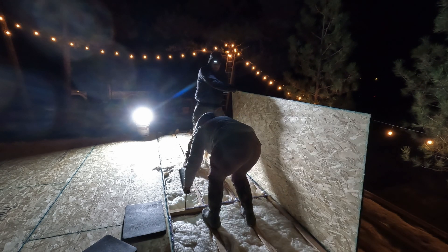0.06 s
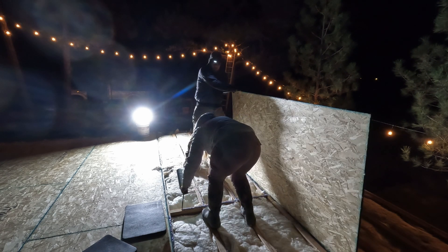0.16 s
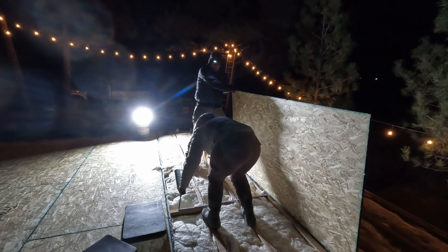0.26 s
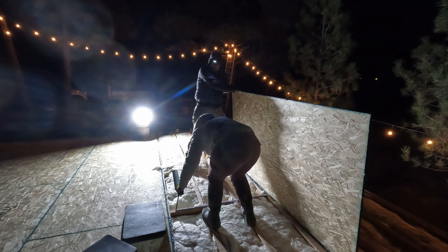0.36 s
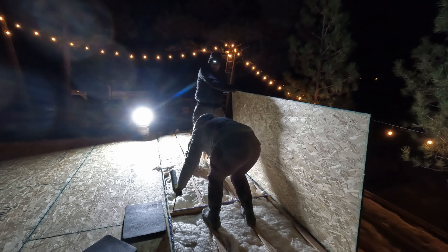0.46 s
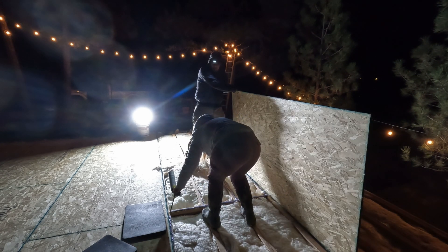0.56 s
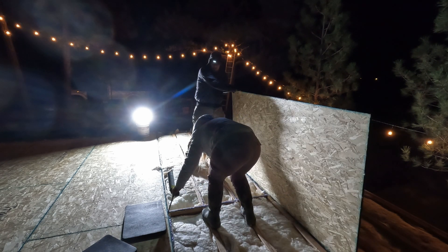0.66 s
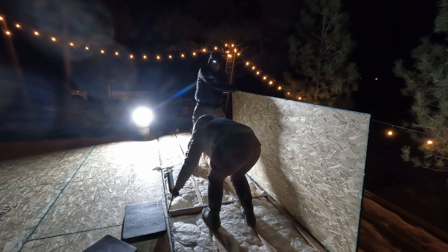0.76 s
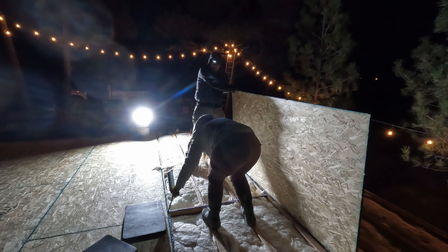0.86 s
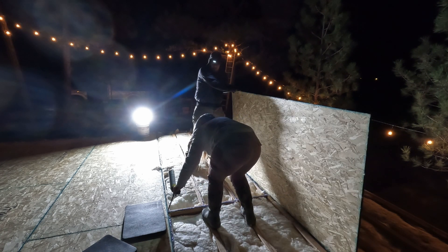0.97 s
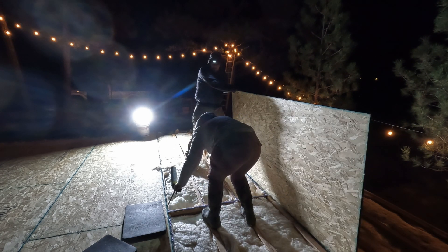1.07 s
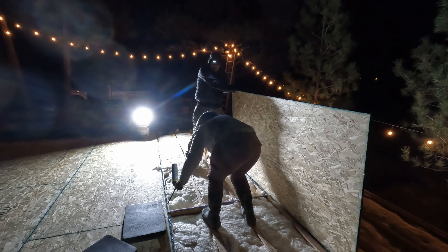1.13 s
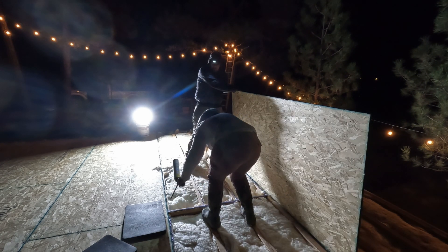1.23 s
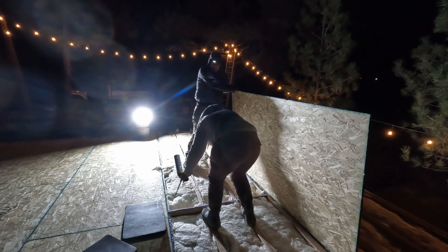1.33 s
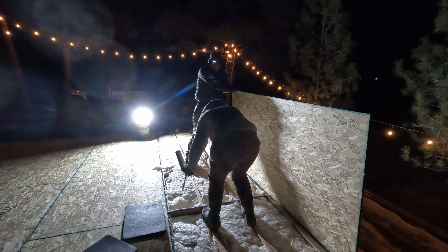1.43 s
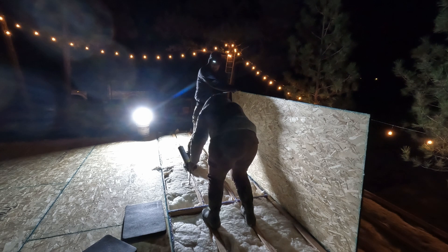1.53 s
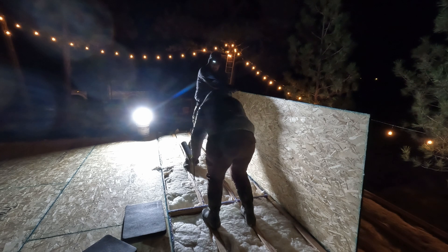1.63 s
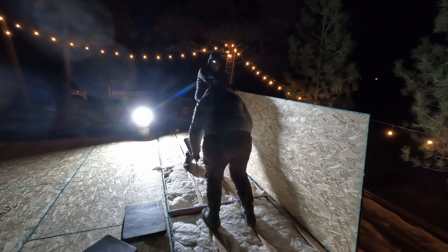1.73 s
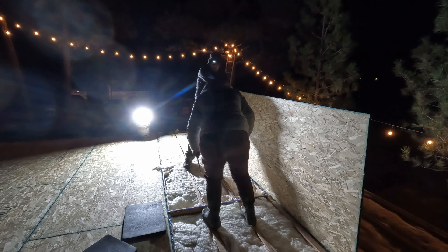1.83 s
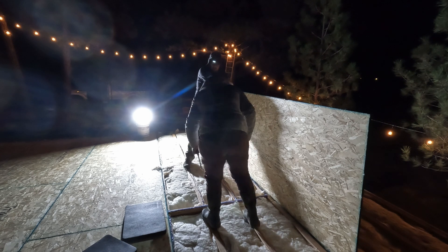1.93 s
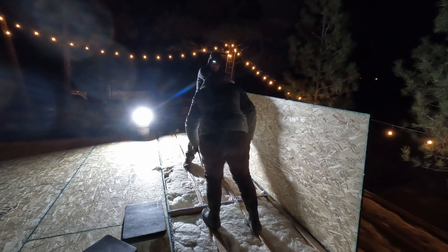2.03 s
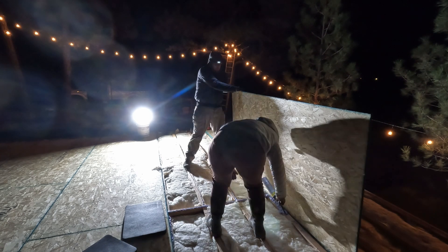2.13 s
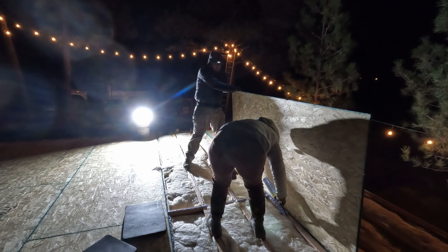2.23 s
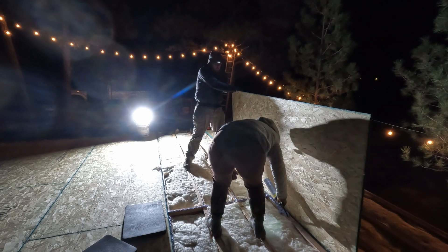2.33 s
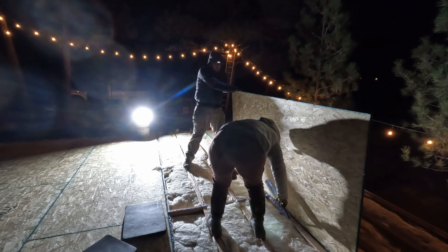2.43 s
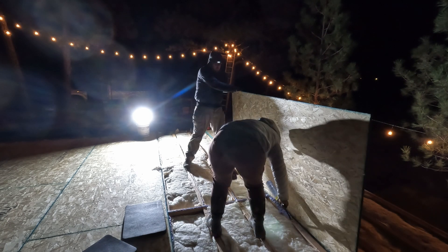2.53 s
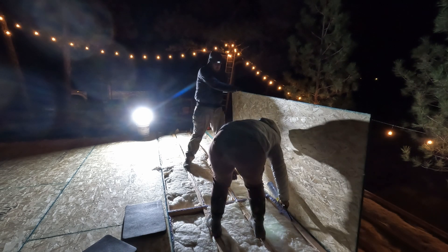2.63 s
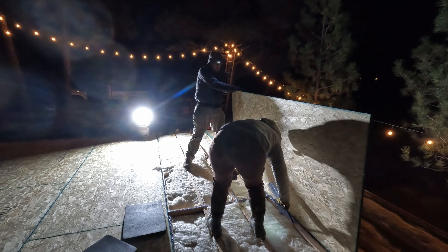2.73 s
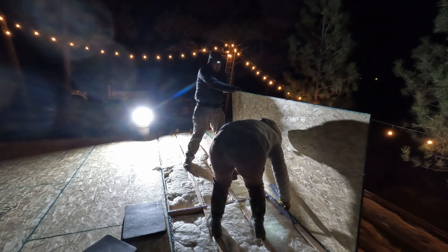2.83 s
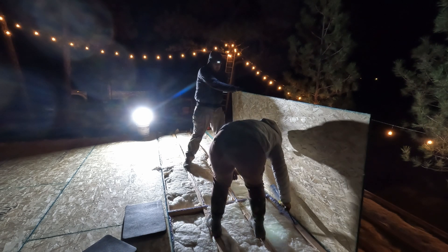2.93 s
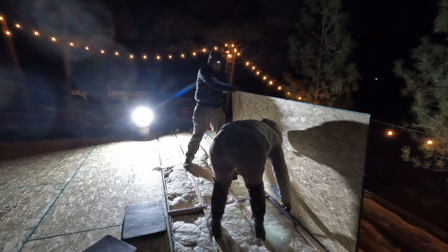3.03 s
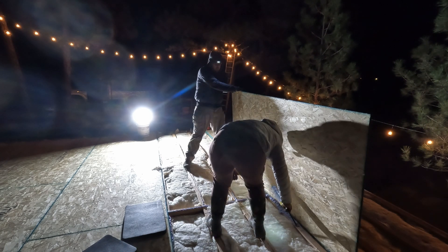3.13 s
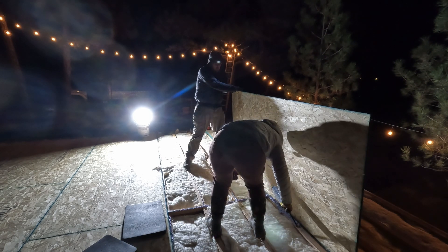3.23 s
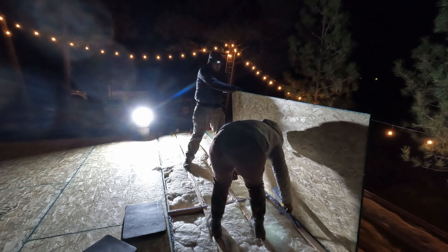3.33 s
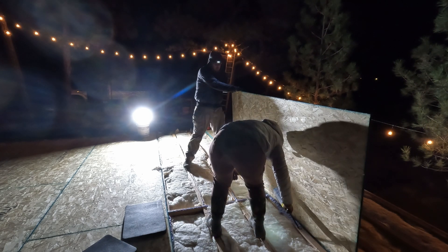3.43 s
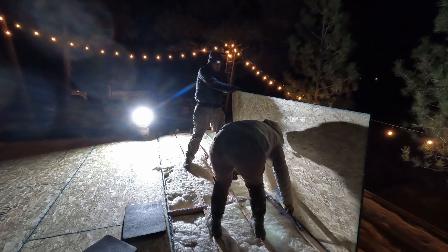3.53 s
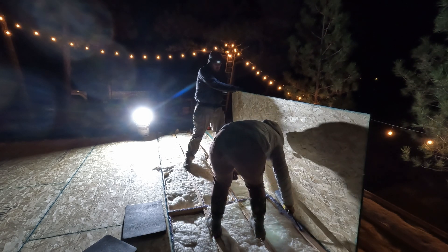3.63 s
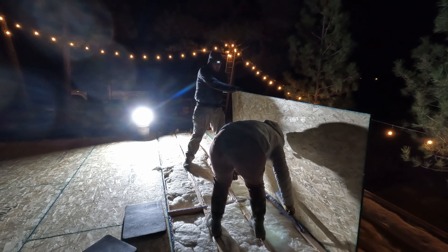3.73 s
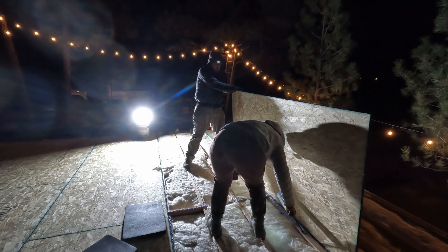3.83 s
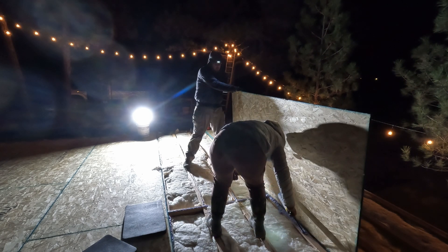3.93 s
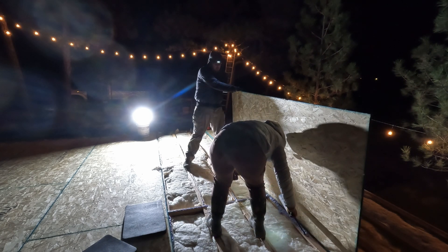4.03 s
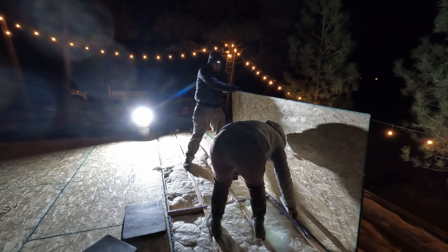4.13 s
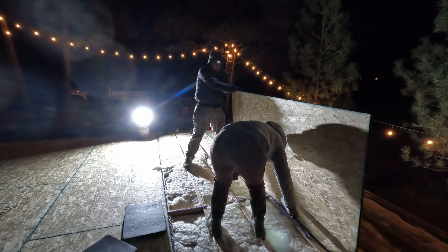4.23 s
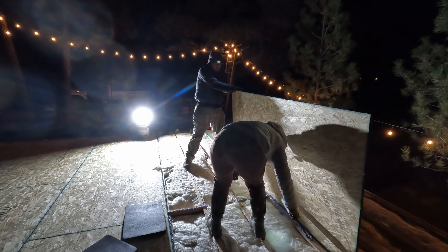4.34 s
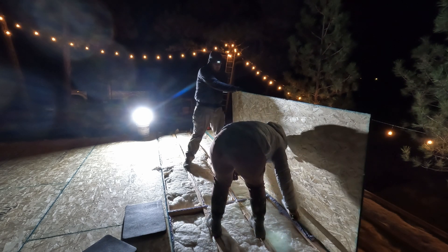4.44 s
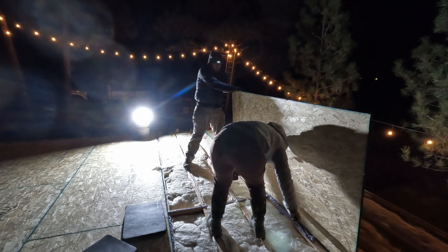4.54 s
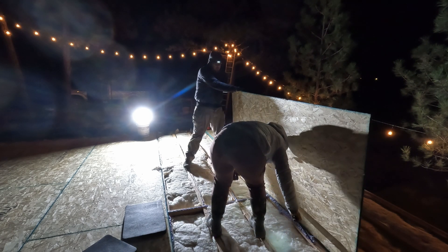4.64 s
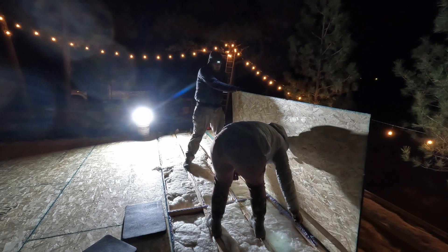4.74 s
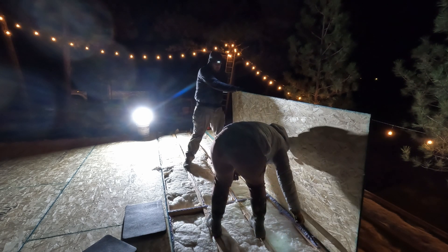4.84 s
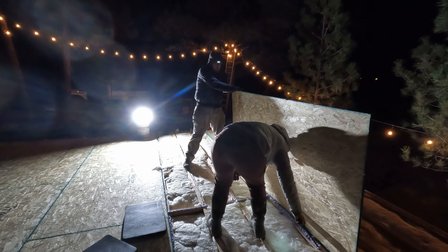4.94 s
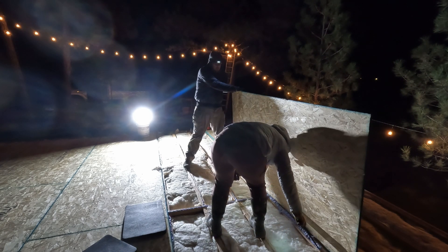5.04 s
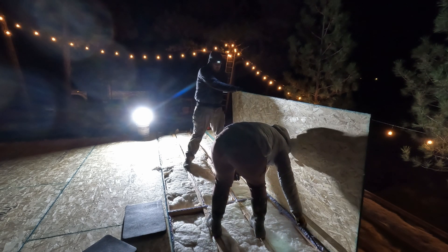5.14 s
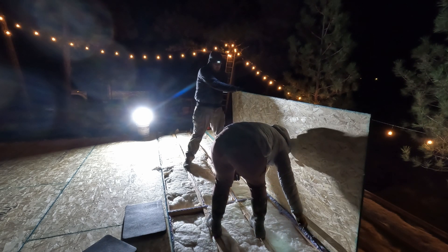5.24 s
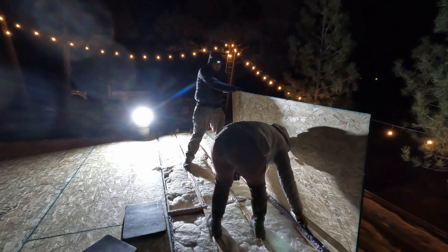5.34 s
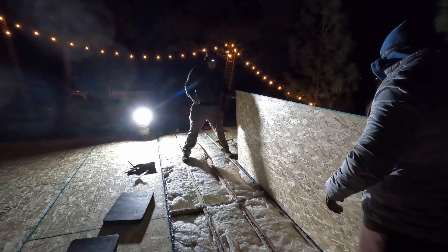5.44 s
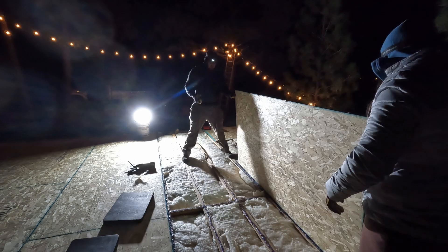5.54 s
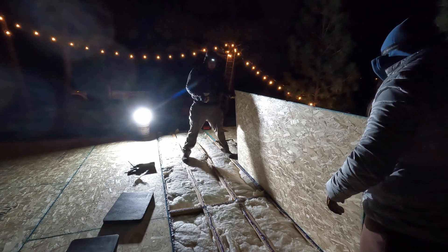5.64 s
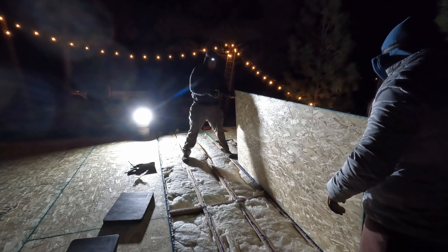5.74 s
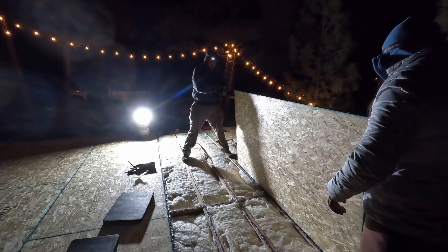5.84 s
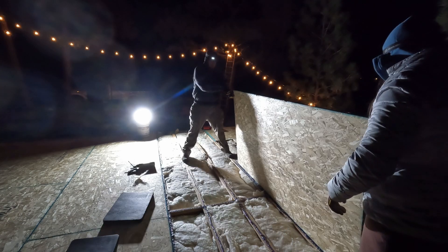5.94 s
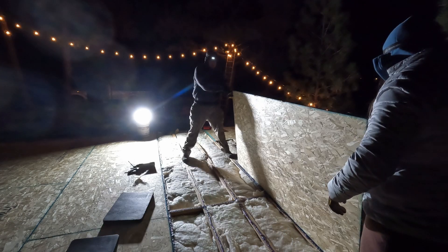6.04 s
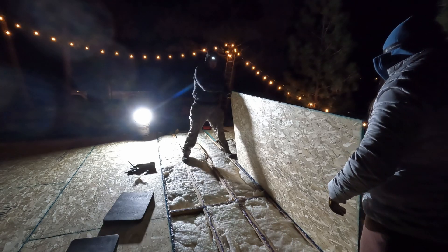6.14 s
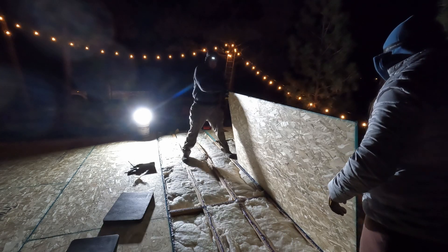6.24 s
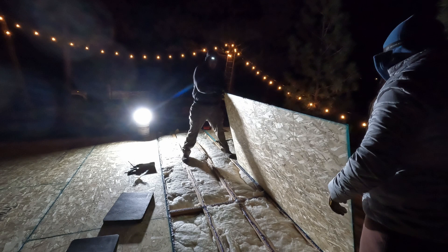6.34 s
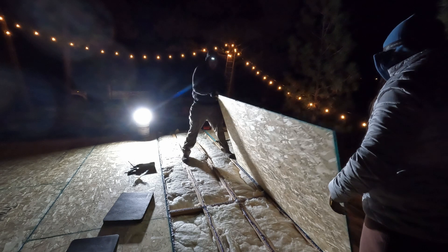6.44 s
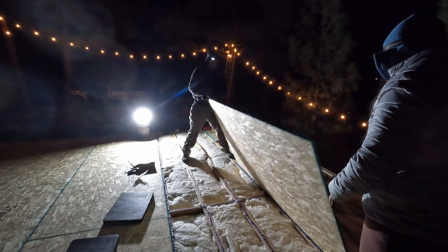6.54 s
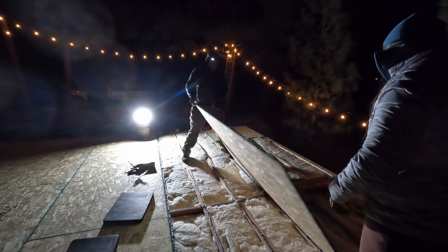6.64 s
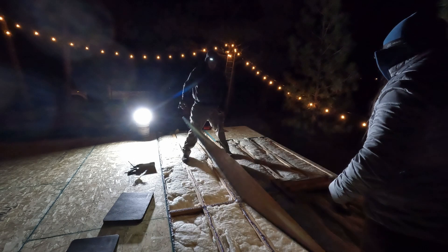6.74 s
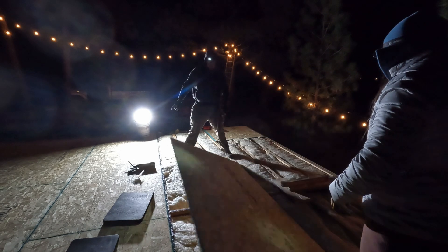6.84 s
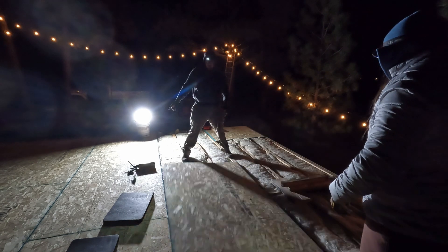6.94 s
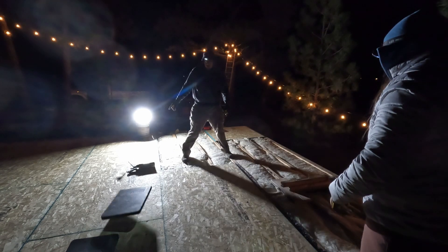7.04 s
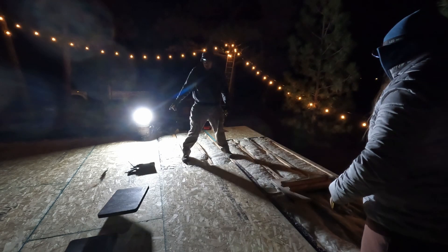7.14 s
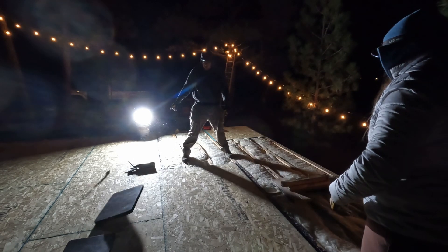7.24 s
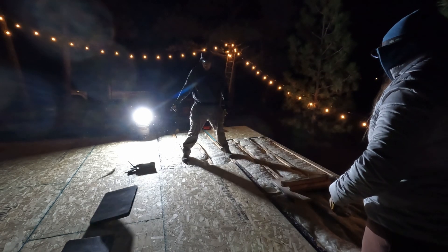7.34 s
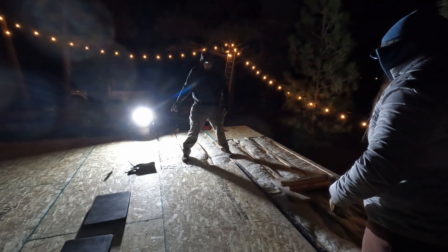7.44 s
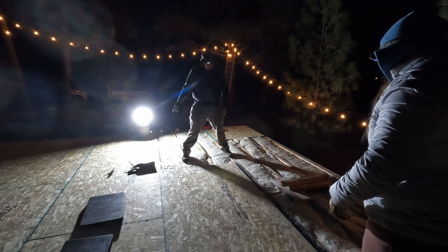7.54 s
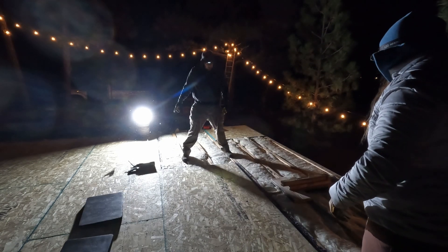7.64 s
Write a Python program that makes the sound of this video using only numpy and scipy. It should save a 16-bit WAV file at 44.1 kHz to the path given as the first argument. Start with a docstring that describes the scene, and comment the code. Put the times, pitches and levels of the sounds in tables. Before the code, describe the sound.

Close foam glue gun sputters two crackling, spitting beads on a quiet night deck, then a large wooden sheet slams flat with a booming thud.

```python
"""Foam gun and slamming sheet on a night deck

On a timber deck at night, close to the microphone, a foam glue gun sputters two beads along the joists:
filtered noise clicks spit as gas pockets over a crackle of many short ringing bubble bursts.
Boots shift and scuff as sliding grit; a smooth hiss swells between the beads. Then a big wooden sheet is
tipped over, pushes the air out from under it and slams flat: blows ring the deck's modes, slow swings
shake the deck the microphone stands on, and short echoes answer over the quiet noise of the night."""
import sys
import numpy as np
from scipy import signal
from scipy.fft import rfft, irfft
from scipy.io import wavfile
from scipy.ndimage import uniform_filter1d

SR = 44100
rng = np.random.default_rng(int(sys.argv[2]) if len(sys.argv) > 2 else 0)


def natural_amplitude(level_db):
    """Convert a level in decibels to a linear amplitude factor, elementwise."""
    exponent = np.asarray(level_db, float) / 20
    return 10 ** exponent


def pcm_store(signal):
    """Save signal as 16-bit PCM."""
    levels = np.round(np.clip(np.atleast_2d(signal), -1, 1) * 32767)
    wavfile.write(sys.argv[1], SR, levels.astype(np.int16).T)


N = 339129  # samples

# Levels of the gun's sounds are those inside the nozzle; spectra set shape only, not loudness.
# gas pockets blowing through the nozzle:
# (time [s], length [ms], hiss level [dB], gurgle level [dB], hiss centre [Hz])
SPITS = [(0.0388, 8.9, -62, -42.5, 4250.0), (0.054, 10.7, -47, -41.0, 4820.0),
         (0.133, 11.2, -47.0, -40, 4700), (0.1626, 8.2, -48, -42.0, 5150),
         (0.239, 11.4, -43.5, -38.5, 4170.0), (0.2971, 6.8, -43, -39.5, 5050),
         (0.3362, 11, -42.0, -41.0, 5300), (0.3559, 11.6, -44.5, -39, 4660.0),
         (0.4347, 12.3, -44.5, -37.5, 4870), (0.4581, 6.8, -53.0, -45, 4280.0),
         (0.4984, 12, -59, -46.5, 4110.0), (0.526, 12.6, -55.5, -43.5, 5170.0),
         (0.597, 8.0, -55.0, -44.0, 4030.0), (0.613, 10.2, -44, -37.5, 4040),
         (0.6532, 8.7, -54, -50, 3780.0), (0.6728, 13, -53, -42, 3620.0), (0.724, 14.4, -39, -36, 4100),
         (0.7666, 9.6, -49, -40, 4680.0), (0.777, 9.5, -48, -33, 3810.0), (2.1808, 8, -44, -32.5, 3840),
         (2.2188, 9.3, -43.5, -35.5, 3750.0), (2.241, 7.7, -39.5, -35.5, 3840.0),
         (2.25, 5.0, -45, -43.0, 4670.0), (2.3083, 11.2, -39, -39, 4130), (2.3477, 8.1, -42, -38, 4170.0),
         (2.3735, 10.7, -45, -37.5, 4540.0), (2.3885, 10.1, -43, -41, 4210.0),
         (2.4428, 9.8, -41.5, -35.5, 4070), (2.486, 16, -39.5, -36.5, 4430.0),
         (2.545, 9.1, -43.5, -35.0, 3940.0), (2.588, 10.6, -42, -35, 4000),
         (2.6026, 11.3, -39.5, -35.5, 4270.0), (2.6465, 9.5, -39.5, -39.5, 5830.0),
         (2.6857, 6.4, -46, -35.5, 3980.0), (2.702, 13.7, -35.5, -36.5, 4320),
         (2.773, 6.3, -46.5, -31, 4840.0), (2.8043, 9.1, -41, -35.0, 4480.0),
         (2.8182, 7.8, -51.0, -37.5, 4030.0), (2.8826, 9, -45.0, -31.5, 3500.0),
         (2.8996, 8.9, -46.0, -36, 4950), (2.9343, 12, -41, -33.0, 4410.0),
         (2.9718, 10, -41.0, -35.5, 5100), (2.9955, 5.3, -46.0, -39.0, 3560.0),
         (3.0498, 9, -43.0, -32.5, 5170), (3.0785, 9.3, -43.5, -34.0, 5460.0),
         (3.1314, 3.1, -46.5, -33, 5750.0), (3.1545, 14.2, -44, -35.5, 5390.0),
         (3.2009, 6.0, -46, -34, 4900.0), (3.2128, 5, -44.5, -36, 6250.0),
         (3.2403, 5.7, -58, -33.5, 4080.0), (3.2622, 7.2, -41.5, -35, 4560),
         (3.2981, 11.8, -48, -33.5, 4260.0), (3.346, 8.2, -47.5, -35, 5450.0),
         (3.3807, 12, -41.0, -35, 5140), (3.4294, 9.4, -52, -36.5, 4710.0),
         (3.4613, 8.8, -49, -39.0, 4640.0), (3.4957, 10.2, -42.5, -34.0, 5500.0),
         (3.5272, 9.4, -37, -32.5, 5500.0), (3.535, 8.6, -47.0, -34.5, 4810.0),
         (3.5527, 4.5, -59, -37, 3860), (3.5815, 7.2, -40, -35, 6100), (3.6544, 5.3, -42, -34, 5860),
         (3.6931, 15, -43.5, -33.0, 6050.0), (3.724, 6.8, -53, -35, 5330.0),
         (3.7796, 4.4, -36.5, -30, 5900), (3.821, 13, -42, -32, 5400.0), (3.8407, 6.4, -46, -35, 5550.0),
         (3.848, 9.3, -46.0, -35, 5300.0), (3.9148, 4.8, -53, -39, 5210.0),
         (3.9333, 8, -40.0, -30.5, 5600.0), (3.9448, 6.8, -50.0, -39.0, 4950.0),
         (3.965, 6.4, -41.5, -35.5, 5130.0), (3.9838, 7.8, -40.5, -36.5, 5600),
         (4.0643, 7.6, -50, -35.5, 5030.0), (4.0989, 12.6, -36.5, -33, 5760),
         (4.1491, 9.5, -37.5, -37.0, 5350), (4.1916, 13, -36.0, -38.5, 5310.0),
         (4.2316, 3.8, -54, -38, 5060.0), (4.2497, 21, -35.5, -35.0, 6100), (4.3084, 5.5, -55, -44, 5400.0),
         (4.3425, 8.7, -40.5, -34.5, 5790.0), (4.3933, 9.9, -37.5, -34, 5660),
         (4.4456, 13.2, -38.5, -36.5, 5300.0), (4.481, 13.6, -38.5, -37.0, 5100),
         (4.5457, 13.4, -37.5, -35.0, 5250), (4.6048, 9.3, -39, -36.5, 5450),
         (4.67, 15.3, -32.5, -32.5, 5000), (4.7022, 9.7, -43.0, -36.0, 5690.0),
         (4.7579, 6.1, -35.5, -33.5, 5300), (4.8237, 5.8, -43.0, -36.0, 4330.0),
         (4.831, 16.3, -43.5, -33.5, 4220.0), (4.8476, 4, -49.0, -37, 4220.0),
         (4.8582, 5.0, -42.0, -41, 4220.0), (4.8954, 9.6, -39.5, -32, 5190.0),
         (4.9154, 11, -56, -35.5, 3830.0), (4.932, 4.9, -47, -44, 4470.0), (4.9395, 21, -44.5, -34.5, 4800),
         (5.006, 14.3, -43.0, -35, 4890.0), (5.0274, 9.9, -47, -32.0, 4370.0),
         (5.0386, 8.1, -45, -33.5, 4780.0), (5.1038, 9.9, -35, -34, 5300), (5.1274, 6.2, -43, -33, 4470.0),
         (5.147, 16, -39.5, -33.5, 4800), (5.1874, 5.2, -38, -38, 4380.0),
         (5.1983, 10.7, -33.0, -34.0, 4970), (5.2397, 6.4, -48.0, -37.5, 4710.0),
         (5.2642, 4.8, -42.0, -31.0, 4980.0), (5.2993, 12.4, -34, -30.0, 5120.0),
         (5.327, 7.2, -35, -32.5, 5060)]
# the largest bubbles bursting, and at 4.9187 s the ring of a knock on the wood:
# (time [s], peak level [dB], pitch [Hz])
POPS = [(0.0413, -23, 2280), (0.1343, -25.5, 2400), (0.2982, -26, 1960), (0.338, -33, 1340),
        (0.3588, -24, 1870), (0.4368, -23, 1770), (0.5318, -26.5, 1820), (0.6765, -33, 1680),
        (0.7312, -23, 1690), (0.7689, -27, 1670), (0.7793, -19.5, 2090), (0.8601, -26.5, 1800),
        (2.1014, -44, 1360), (2.1453, -26.5, 1350), (2.1827, -27.5, 1410), (2.2206, -25.5, 1430),
        (2.308, -22.5, 1940), (2.3474, -23.5, 1360), (2.4442, -28.5, 1440), (2.4869, -29, 2220),
        (2.5453, -24, 2000), (2.7734, -28, 1380), (2.805, -22, 1780), (2.8858, -22, 2030),
        (2.9358, -22.5, 1040), (2.974, -22, 2110), (3.0502, -19, 2320), (3.079, -25, 1120),
        (3.1328, -24.5, 1720), (3.1559, -25, 1670), (3.2026, -27, 1640), (3.241, -22, 1770),
        (3.262, -23.5, 1300), (3.3293, -22.5, 1680), (3.3815, -22.5, 1910), (3.43, -27, 1600),
        (3.4967, -21, 1790), (3.5289, -19, 1650), (3.5802, -22, 1580), (3.6952, -22, 1630),
        (3.7245, -26.5, 1550), (3.7783, -26, 1570), (3.8214, -21, 1680), (3.916, -26, 1370),
        (3.933, -23, 1600), (4.0657, -26, 1570), (4.0989, -19, 1590), (4.15, -28, 1460),
        (4.1922, -25.5, 1560), (4.2499, -21.5, 1390), (4.3956, -22.5, 1450), (4.5462, -21.5, 1440),
        (4.6049, -21, 1950), (4.6696, -21.5, 1190), (4.7046, -23, 1360), (4.7577, -25, 1830),
        (4.833, -20, 1800), (4.896, -21.5, 1130), (4.9187, -25, 912), (4.9477, -25, 1440),
        (5.033, -22.5, 1700), (5.1294, -21, 1350), (5.1486, -19.5, 1130), (5.1895, -27, 1390),
        (5.1996, -23, 1480), (5.228, -24, 1540), (5.2652, -22.5, 1600), (5.2927, -25, 1390),
        (5.3015, -15, 1820), (5.328, -23.5, 2120)]
# foam flow while the trigger is held, one table a bead:
# (time [s], flow level [dB], bubble pitch [Hz], spray centre [Hz], spray against flow [dB])
BEAD_FLOWS = [
    [(0.0, -49.5, 2290, 5100, -4.5), (0.42, -53, 2000, 5170, -4.5), (0.6, -48.5, 2000, 3900, -10),
     (0.8, -45.5, 2140, 4000, -9), (0.95, -69, 1840, 4000, -15)],
    [(2.09, -49.5, 1500, 3650, -4.5), (2.5, -46.5, 1790, 4200, -11.5), (3.1, -45.5, 1750, 5520, -20.5),
     (4.2, -45, 1730, 5500, -16), (4.72, -46.5, 1660, 5180, -12), (4.82, -44, 1570, 4500, -8),
     (5.12, -46, 1500, 4770, -7), (5.33, -51, 1630, 5070, -7), (5.4, -79, 1870, 5100, -10)],
]
# spectrum of the spatter: (frequency [Hz], density [dB per Hz])
SPATTER_COLOUR = [(300, -46), (700, -26), (1500, 19), (3000, -4.5), (5000, -9), (7300, -5.5), (8300, -18.5),
                  (12900, -27), (15500, -43)]
# spectrum of the gas jet: (frequency [Hz], density [dB per Hz])
JET_COLOUR = [(1500, -30), (3000, 0), (4500, -6.5), (7500, 2), (9000, -1.5), (12000, -14.5), (15500, -29)]
# a small nozzle radiates little bass, and the echo off the boards thins a band above the bubbles:
# (frequency [Hz], gain [dB])
NOZZLE_GAIN = [(200, -37), (450, -8.5), (750, -7), (1100, -1), (1800, 0.5), (2600, 1), (3200, -2.5),
               (3900, -1), (9000, 0), (15000, -1.5)]
# how far to the right each bead lies, as a share of the port lag and shadow: (first bead, second bead)
BEAD_SIDE = (0.69, 1)
TICK_DB = -33  # a pop's tick, below its peak
TRAIL_DB, TRAIL_S = -16, 0.0036  # spatter after a spit: level below its hiss, decay time constant

# blows on the wood, before the split between clear and blurred modes:
# (time [s], level [dB], contact time [ms], crack level [dB], crack rise time [ms])
BLOWS = [(4.9186, -21.5, 0.89, -28.5, 1.2), (6.195, -50, .2, -65, 0.86), (6.2326, -44.5, 0.3, -43, 1.1),
         (6.495, -61, 0.087, -57.5, 1.9), (6.928, -71, 0.088, -65.5, 3), (7.076, -42, 0.16, -48, 1),
         (7.1105, -11.5, 0.54, -20, 1.6), (7.1166, -5, 2.7, -44, 1.8), (7.1164, -9.5, 0.43, -12, .6),
         (7.1194, -12.5, 0.47, -5.5, 0.74), (7.129, -28, 0.32, -22, 0.37), (7.137, -23, 0.41, -18.5, 0.53),
         (7.1779, -27.5, 0.16, -36, 1.9), (7.2116, -34, 0.19, -43, 2.3), (7.2396, -27, 0.79, -48, 1.5),
         (7.275, -36, 0.14, -63, 3.2), (7.313, -53, 0.12, -65, 1), (7.3746, -29, 3, -32, 2.8),
         (7.378, -55, 0.12, -58, 2), (7.42, -57, 0.14, -58.5, 1.2), (7.604, -36, 3, -48.5, 2.3),
         (7.637, -56, 0.14, -57.5, 1.7)]
# what sheet and joists ring with: (frequency [Hz], level [dB], time to fall 60 dB [s])
DECK_MODES = [(107.1, -5.5, 0.26), (147.5, -11.5, 0.42), (193.6, -7, 0.44), (239, -9, 0.15),
              (311, 0.5, 0.084), (380.7, -12.5, 0.1), (468, -7, 0.23), (644, -9, 0.02), (940, -21, 0.12),
              (1170, 9, 0.011), (1500, 8.5, 0.016), (2000, 4, 0.014), (2920, -21, 0.014), (3800, -18, .012),
              (5500, -40, .01)]
MODES_DB, BLUR_DB, BLUR_T60 = -10, -12.5, 0.14  # share of clear modes and of blurred ones; decay [s]
# air drawn after the falling sheet: (start [s], landing [s], level at landing before smoothing [dB])
AIR_PUSH = (7.075, 7.112, -11)
# deck and single joists swinging under a shifted load, before smoothing:
# (time [s], level [dB], frequency [Hz], number of swings)
BOUNCES = [(2.77, -35, 101, 14.7), (2.62, -47, 179, 14), (6.285, -40.5, 42.3, 4.2),
           (6.922, -37, 21.3, 2.43), (7.109, -10.5, 37, 1.35), (7.137, -19.5, 30.3, 2.3),
           (7.288, -19.5, 25.3, 2.6), (7.411, -35.5, 23.8, 2.4), (7.51, -36, 28, 2.05)]
# air speeds up as the gap under the sheet closes
GAP_OPENS_S, GAP_SHUT_S = 7.05, 7.122
RUSH_DB, RUSH_S, RUSH_POWER = -15, 0.011, 2.67  # level as the gap shuts, time scale, steepness

# boots and the sheet's edge scuffing on wood:
# (time [s], length [s], level [dB], first centre [Hz], last centre [Hz])
SCUFFS = [(6.179, 0.046, -47.5, 2410, 1790), (6.198, 0.11, -50, 1820, 1500),
          (6.4, 0.051, -63.5, 1610, 1710), (6.47, 0.13, -76, 1630, 1700), (6.626, 0.068, -64.5, 1500, 1500),
          (6.674, 0.098, -56.5, 1500, 1630), (6.957, 0.13, -64, 1500, 1600),
          (7.572, 0.1, -64.5, 5500, 5930), (6.267, 0.4, -67.5, 1740, 1610), (6.705, 0.046, -66, 6100, 6600)]
# spectrum of the friction: (frequency [Hz], density [dB per Hz])
SCUFF_COLOUR = [(240, -34.5), (400, -27.5), (867, -39), (1020, -4), (1500, -2.5), (1820, -1.5), (3050, -8),
                (3550, -15), (9370, -19.5), (15000, -68)]
# spectrum of grit and loose boards: (frequency [Hz], density [dB per Hz])
RATTLE_COLOUR = [(150, -31.5), (250, -9), (314, -13), (629, -26), (928, -13), (1720, -14.5), (3340, -40),
                 (6380, -46), (12000, -82), (15600, -102), (22000, -120)]
# grit and loose boards: a burst, then a long settling; T60 in seconds
RATTLE_S, CLATTER_DB, CLATTER_T60, RATTLE_DB, RATTLE_T60 = 7.126, -20, 0.06, -39.5, 0.98

# weight shifting on the deck:
# (time [s], time scale [s], sway level [dB], joist hum level [dB], hum centre [Hz])
STEPS = [(0.145, 0.17, -55, -67, 100), (1.22, 0.77, -60, -75, 110), (1.916, 0.31, -44.5, -51.5, 100),
         (2.59, 0.66, -52, -52.5, 117), (3.186, 0.47, -55.5, -58, 117), (3.63, 0.81, -52.5, -55, 140),
         (4.296, 0.67, -66, -56.5, 147), (4.904, 0.21, -44, -41, 121), (5.094, 0.36, -61, -55, 150),
         (6.2, 0.23, -51, -51.5, 110), (6.498, .15, -53, -74, 95), (6.704, 0.18, -48.5, -75, 96),
         (7.12, .35, -30, -30, 110), (7.56, 0.34, -46, -54, 105)]
STEP_RISE = 0.28  # share of the time scale spent loading
IDLE_SWAY_DB, IDLE_HUM_DB = -72, -75.5  # the deck never quite rests

# a smooth hiss swells between the beads, before SWELL_BOOST_DB: (time [s], level [dB])
SWELL = [(0.9, -86), (0.956, -91), (1.446, -67.5), (1.64, -67), (1.72, -60.5), (2.1, -61.5), (2.105, -74)]
SWELL_BOOST_DB = 5.0
# spectrum of the swelling hiss: (frequency [Hz], density [dB per Hz])
SWELL_COLOUR = [(290, -23), (500, -4), (577, -7.5), (737, -15), (1030, -1), (1990, 1.5), (6740, -2.5),
                (10700, -10.5), (13800, -30), (15500, -27)]
# a faint steady hum in the night air: (frequency [Hz], width [Hz], level [dB])
HUM = [(127, 6, -76.5), (156, 13.6, -70)]
# spectrum of the night noise: (frequency [Hz], density [dB per Hz])
NIGHT_COLOUR = [(12, -26.5), (20, 0.5), (60, -8), (76, -37), (139, -10), (214, -11), (252, -23), (390, -19),
                (424, -22), (793, -34), (1010, -26.5), (2490, -25), (3850, -41.5), (5640, -35),
                (11000, -48.5), (15500, -78)]
NIGHT_DB = -61

# likeness of the two sides in diffuse sound: (frequency [Hz], left-right likeness [0 to 1])
LIKENESS = [(60, 0.29), (640, 0.63), (1400, 0.68), (7000, 0.72), (15000, .4)]
# lag between the microphone ports at full share: (frequency [Hz], left leads by [radians])
PORT_PHASE = [(20, 0), (1000, -.2), (3000, -.55), (5000, -.45), (8000, -.7), (11000, -1), (12500, -2),
              (15000, -3)]
# shadow between the microphone ports at full share: (frequency [Hz], left minus right [dB])
PORT_DB = [(60, -1), (380, -2.5), (1300, -3.5), (2400, -3.5), (4400, -2), (8000, -.5), (15000, 0)]


def pop(hz, cycles):
    """A bubble wall snaps inward and rings a cycle or two, peak 1."""
    turns = np.arange(400) * hz / SR
    ring = -np.sin(2 * np.pi * turns) * turns ** 2 * np.exp(-turns / cycles)
    return ring / abs(ring).max()


def bubble_crackle(centre_hz):
    """Random bursts in 14 bubble sizes ring as fizz and as denser gurgle; also returns the bare bursts."""
    fizz, gurgle, bursts = np.zeros((3, N))
    # froth comes unevenly
    clumps = natural_amplitude(1.5 * evened(uniform_filter1d(rng.standard_normal(N), size=500)))
    for hz in np.geomspace(900, 3600, 14):
        # bubble sizes scatter around the current one
        common = np.exp(-(np.log(hz / centre_hz) / 0.49) ** 2)
        burst = common * clumps * grit(100, 4.0)
        bursts += burst
        fizz += signal.oaconvolve(burst, pop(hz, 0.36))[:N]
        gurgle += signal.oaconvolve(common * grit(200, 1.54), pop(hz, 0.48))[:N]
    return fizz, gurgle, bursts


def foam_spray(bursts, centre_hz):
    """Spatter follows the bubble bursts over steady noise, with a moving resonance."""
    spray = coloured(evened(bursts) + 0.42 * rng.standard_normal(N), SPATTER_COLOUR)
    return evened(0.68 * spray + resonate(spray, centre_hz, 1440))


def add_spits(out, jet, gurgle):
    """Each gas pocket gurgles, gives way to a jet of gas and trails off in spatter."""
    tail = np.exp(-np.arange(1500) / (TRAIL_S * SR))
    for s, ms, hiss_db, gurgle_db, hz in SPITS:
        at, size = round(s * SR), round(ms * SR / 1000)
        u = np.linspace(0, 1, size)
        gas = jet[at:at + size]
        hiss = band(gas, 0.67 * hz, 1.215 * hz) + 0.43 * (hz / 5000) ** 1.7 * gas
        puff = hiss * evened(np.sin(np.pi * u ** 1.2) ** 0.94)
        wet = evened(gurgle[at:at + size]) * evened(np.minimum(u / 0.3, 1) * (1 - u) ** 0.34)
        add(out, s, natural_amplitude(hiss_db) * puff + natural_amplitude(gurgle_db) * wet)
        add(out, s + size / SR, natural_amplitude(hiss_db + TRAIL_DB) * tail * jet[at:at + 1500])


def add_pops(out, jet):
    """The largest bubbles, and one knock on the wood, ring singly with a short tick of jet noise."""
    for s, db, hz in POPS:
        add(out, s, natural_amplitude(db) * pop(hz, 0.45))
        add(out, s, natural_amplitude(db + TICK_DB) * np.hanning(90) * jet[round(s * SR):][:90])


def glue_gun():
    """Crackle, spray, spits and single pops (one the ring of a knock), through the small nozzle's filter."""
    both_beads = BEAD_FLOWS[0] + BEAD_FLOWS[1]
    fizz, gurgle, bursts = bubble_crackle(follow(both_beads, column=2))
    jet = coloured(grit(9000, 1.5), JET_COLOUR)
    flow = sum(level(rows) for rows in BEAD_FLOWS)
    spray = foam_spray(bursts, follow(both_beads, column=3))
    out = flow * evened(fizz)
    out += flow * natural_amplitude(follow(both_beads, column=4)) * spray
    add_spits(out, jet, gurgle)
    add_pops(out, jet)
    return out.std() * coloured(out, NOZZLE_GAIN)


def wood_blows():
    """Each blow is a raised-cosine force into the deck's modes; longer contact gives a duller crack."""
    t = np.arange(SR // 2) / SR
    modes = np.zeros(len(t))
    for k, (hz, db, t60) in enumerate(DECK_MODES):
        modes += (-1) ** k * natural_amplitude(db - 60 * t / t60) * np.sin(2 * np.pi * hz * t)
    # the many higher modes blur into noise
    blur = natural_amplitude(BLUR_DB - 60 * t / BLUR_T60) * band(rng.standard_normal(len(t)), 100, 900)
    out = np.zeros(N)
    for s, db, ms, crack_db, crack_ms in BLOWS:
        force = np.hanning(round(ms * SR / 1000) + 3)
        force = force / force.sum()
        add(out, s, natural_amplitude(db + MODES_DB) * signal.oaconvolve(modes, force))
        add(out, s, natural_amplitude(db) * signal.oaconvolve(blur, force))
        u = t[:900] * 1000 / crack_ms
        top_hz = np.clip(900 / ms, 400, 9000)
        crack = band(rng.standard_normal(900), 0.37 * top_hz, top_hz)
        add(out, s - 0.0005, natural_amplitude(crack_db) * u * np.exp(1 - u) * crack)
    return out


def falling_sheet():
    """Pressure sinks ever faster until the landing, under a rush of air; deck and joists swing on loads."""
    t = np.arange(N) / SR
    start, landing, db = AIR_PUSH
    u = (t - start) / (landing - start)
    swing = -natural_amplitude(db) * np.clip(u, 0, 1) ** 2.4 * (u < 1)
    for s, db, hz, swings in BOUNCES:
        turns = np.arange(0, swings, hz / SR)
        add(swing, s, natural_amplitude(db) * np.sin(2 * np.pi * turns) * signal.windows.tukey(len(turns), 0.35))
    left_s = GAP_SHUT_S - t
    gap_open = (left_s > 0) * (left_s < GAP_SHUT_S - GAP_OPENS_S)
    rush = natural_amplitude(RUSH_DB) * (1 + abs(left_s) / RUSH_S) ** -RUSH_POWER * gap_open
    return uniform_filter1d(swing, 300) + rush * band(rng.standard_normal(N), 600, 2900)


def scuffs():
    """Gritty friction whose colour slides along each stroke."""
    out, friction = np.zeros(N), coloured(grit(2000, 2.9), SCUFF_COLOUR)
    for s, length, db, first_hz, last_hz in SCUFFS:
        rub = friction[round(s * SR):][:round(length * SR)]
        focus = resonate(rub, np.linspace(first_hz, last_hz, len(rub)), 0.28 * first_hz)
        add(out, s, natural_amplitude(db) * (focus + 0.23 * rub) * signal.windows.tukey(len(rub), 0.8))
    return out


def rattle():
    """Grit and loose boards: dense clicks decaying as a short clatter and a long settling."""
    t = np.maximum(np.arange(N) / SR - RATTLE_S, 0)
    decay = natural_amplitude(CLATTER_DB - 60 * t / CLATTER_T60) + natural_amplitude(RATTLE_DB - 60 * t / RATTLE_T60)
    return (t > 0) * decay * coloured(grit(4600, 1.1), RATTLE_COLOUR)


def deck_steps():
    """Sway and hum of the joists: each load comes on quickly and eases off."""
    sway, joist_hum = np.full(N, natural_amplitude(IDLE_SWAY_DB)), np.full(N, natural_amplitude(IDLE_HUM_DB))
    for s, length, sway_db, hum_db, hz in STEPS:
        u = np.arange(0, 2, 1 / (length * SR))
        load = u / STEP_RISE * np.exp(1 - u / STEP_RISE)
        add(sway, s, natural_amplitude(sway_db) * load ** 2)
        add(joist_hum, s, natural_amplitude(hum_db) * load ** 2)
    low = band(band(rng.standard_normal(N), 17.5, 50.6), 23.4, 55)
    centre_hz = uniform_filter1d(follow(STEPS, column=4), 2000)
    return sway * low + joist_hum * resonate(band(rng.standard_normal(N), 70, 395), centre_hz, 69)


def yard_echoes(x):
    """Sparse echoes from the deck and nearby walls, other ones for each side."""
    slots = np.arange(130, 9000, 22)  # one echo in each 22 samples
    at = slots + rng.integers(0, 22, (2, len(slots)))
    taps = np.zeros((2, 9100))
    echo = rng.choice([-1., 1.], at.shape) * natural_amplitude(-60 * at / SR / 0.14)  # falls 60 dB in 0.14 s
    np.put_along_axis(taps, at, echo, 1)
    dull = signal.lfilter([0.3], [1, -0.7], x)
    return signal.oaconvolve(dull[None], taps / np.linalg.norm(taps[0]), axes=1)[:, :N]


def swelling_hiss():
    """Smooth diffuse noise that swells between the beads."""
    return level(SWELL) * natural_amplitude(SWELL_BOOST_DB) * diffuse(SWELL_COLOUR)


def night_hum():
    """Two fuzzy low tones: noise through narrow resonances."""
    return sum(natural_amplitude(db) * resonate(rng.standard_normal(N), np.full(N, hz), width) for hz, width, db in HUM)


def night_air():
    """Steady diffuse noise around the deck."""
    return natural_amplitude(NIGHT_DB) * diffuse(NIGHT_COLOUR)


def diffuse(points):
    """Two partly alike channels of noise, as sound from all around reaches two ports."""
    left, other = rng.standard_normal((2, N))
    same = np.clip(read(LIKENESS, np.fft.rfftfreq(N, 1 / SR)), 0, 1)
    right = irfft(same * rfft(left) + np.sqrt(1 - same ** 2) * rfft(other), N)
    return np.array([coloured(left, points), coloured(right, points)])


def placed(x, share):
    """The two microphone ports hear a near source with a small lag and shadow."""
    hz = np.fft.rfftfreq(N, 1 / SR)
    turn = natural_amplitude(share * read(PORT_DB, hz) / 2) * np.exp(0.5j * share * read(PORT_PHASE, hz))
    return irfft(rfft(x) * np.array([turn, 1 / turn]), N)


def grit(per_s, spread_db):
    """Sparse clicks of random sign, a few of them large."""
    size = natural_amplitude(spread_db * np.minimum(rng.exponential(1, N), 4))
    return size * (rng.random(N) < per_s / SR) * rng.choice([-1., 1.], N)


def coloured(x, points):
    """Gives x a spectrum, by a minimum-phase filter, at rms 1."""
    gain_db = np.maximum(read(points, abs(np.fft.fftfreq(8192, 1 / SR))), -100)
    log_gain = np.log(natural_amplitude(gain_db))
    taps = np.fft.ifft(np.exp(np.conj(signal.hilbert(log_gain)))).real[:4096]
    return evened(signal.oaconvolve(x, taps)[:len(x)])


def band(x, lo_hz, hi_hz):
    """Band-passes x, at rms 1."""
    return evened(signal.sosfilt(signal.butter(2, [lo_hz, hi_hz], "band", fs=SR, output="sos"), x))


def resonate(x, hz, width):
    """Resonance on a moving centre: shifts the curve hz to zero, smooths, shifts back, at rms 1."""
    turn, r = np.exp(2j * np.pi * np.cumsum(hz) / SR), np.exp(-np.pi * width / SR)
    return evened((turn * signal.lfilter([1 - r], [1, -r], x / turn)).real)


def evened(x):
    """Scales x to rms 1."""
    return x / np.sqrt(np.mean(x ** 2) + 1e-20)


def read(points, hz):
    """Reads a spectrum table along a logarithmic frequency axis."""
    f, value = np.transpose(points)
    return np.interp(np.log(hz + 1), np.log(f + 1), value)


def follow(rows, column):
    """A table column as a curve over time."""
    rows = np.asarray(rows)
    return np.interp(np.arange(N) / SR, rows[:, 0], rows[:, column])


def level(rows):
    """Gain curve from (time, dB) rows, silent outside its table."""
    rows = np.asarray(rows)
    db = np.interp(np.arange(N) / SR, rows[:, 0], rows[:, 1], -140, -140)
    return uniform_filter1d(natural_amplitude(db), size=100)


def add(mix, s, sound):
    """Adds a sound at s seconds, cut at the end of the mix."""
    part = mix[round(s * SR):][:len(sound)]
    part += sound[:len(part)]


def scene():
    """Places gun, slam and boots before the microphone, with echoes and the night around them."""
    nozzle, slam = glue_gun(), wood_blows()
    echoes = natural_amplitude(-11) * yard_echoes(nozzle) + natural_amplitude(-9.0) * yard_echoes(slam)
    echoes = echoes + 0.27 * echoes[::-1]  # the ports sit close together
    first_bead = np.arange(N) < 1.5 * SR
    near = placed(nozzle * first_bead, BEAD_SIDE[0]) + placed(nozzle * ~first_bead, BEAD_SIDE[1])
    near += placed(slam + falling_sheet() + deck_steps() + night_hum(), 0.15)
    near += placed(scuffs() + rattle(), 0.94)
    return near + echoes + swelling_hiss() + night_air()


def roll_off(x):
    """The treble ends steeply here."""
    return signal.sosfilt(signal.butter(12, 15680, fs=SR, output="sos"), x)


def record(dry):
    """The input stage rounds off the slam's peak; the band ends steeply at the top."""
    rounded = 1.2 * np.tanh(dry / 1.2)
    edge = signal.firwin(255, 15600, window=("kaiser", 8), fs=SR)
    mix = signal.oaconvolve(rounded, edge[None], "same", axes=1)
    return roll_off(mix)


dry = scene()
out = record(dry)
pcm_store(out)
```